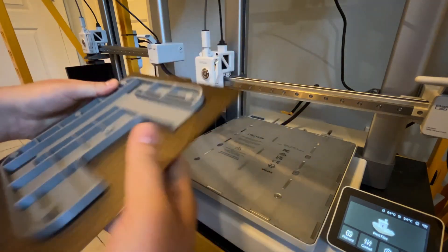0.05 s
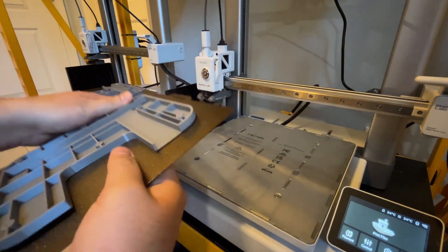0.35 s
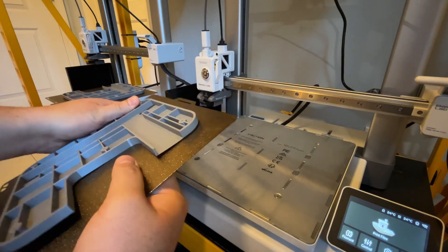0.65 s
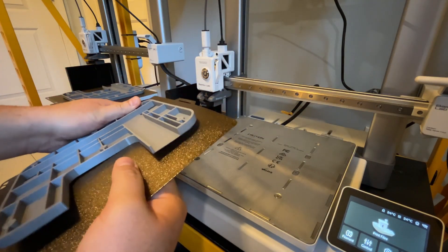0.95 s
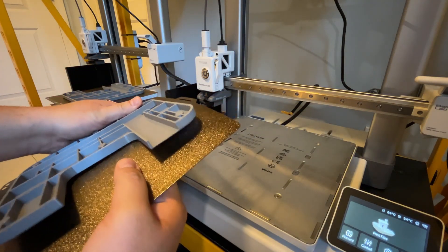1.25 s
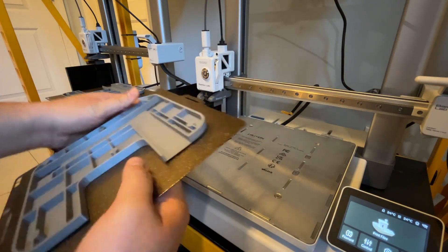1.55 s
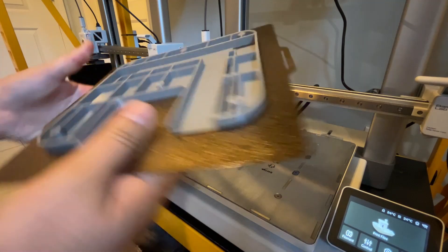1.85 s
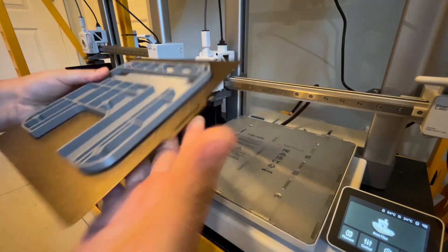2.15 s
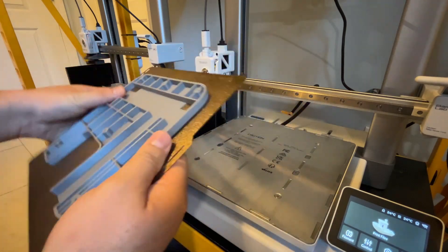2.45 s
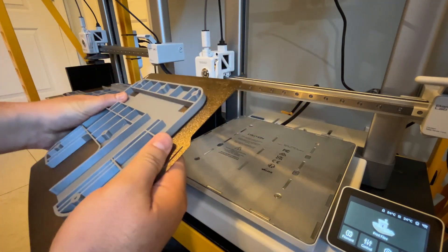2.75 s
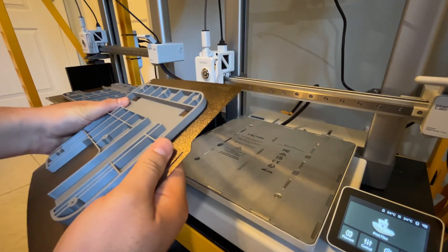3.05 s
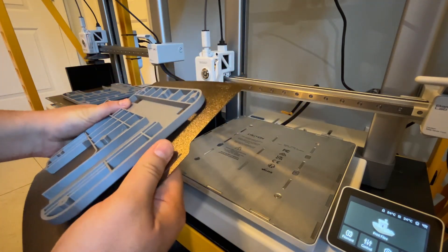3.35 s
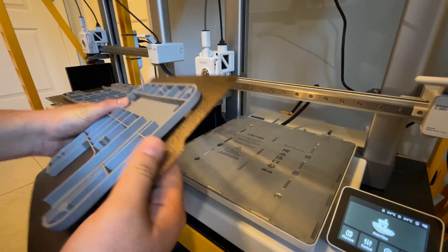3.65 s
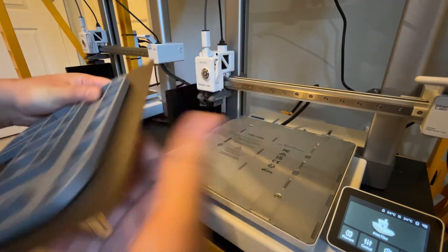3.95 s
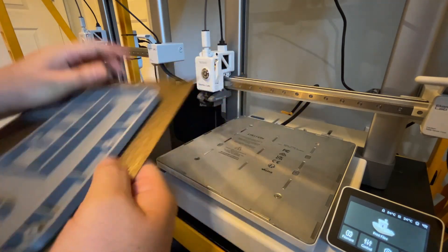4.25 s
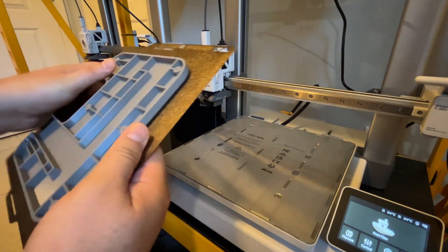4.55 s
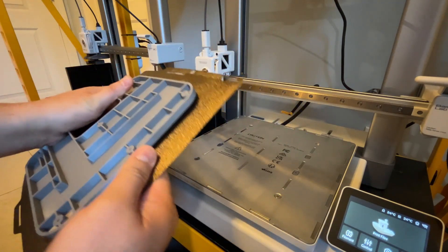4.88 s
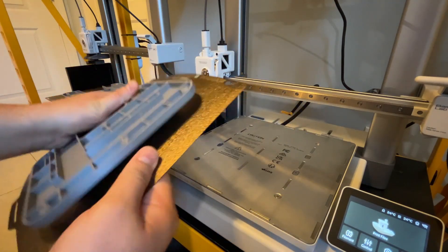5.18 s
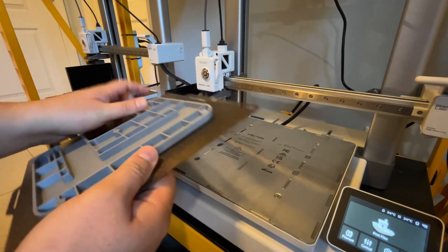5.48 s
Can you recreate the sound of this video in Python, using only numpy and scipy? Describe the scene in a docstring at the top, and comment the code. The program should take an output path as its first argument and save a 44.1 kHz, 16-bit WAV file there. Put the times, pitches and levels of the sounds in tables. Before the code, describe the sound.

Close ticks thicken into crackles and sharp rips as plastic pops off a bent metal sheet, with soft finger knocks between three pulls.

```python
"""A small room, with the microphone close to a spring-steel build plate that is flexed by hand three times.
Printed parts peel off its textured coating as tiny bonds break: sparse ticks thicken to crackle, then
to a rip. The second and third pulls end in a twang and the ring of the freed part. Between pulls the
hands knock and slide on the plate, over handling rumble, room air and a faint machine hum.
The loudest rips overload the microphone."""
import sys
import numpy as np
from scipy import signal
from scipy.fft import rfft, irfft
from scipy.io import wavfile
from scipy.ndimage import uniform_filter1d

SR = 44100
rng = np.random.default_rng(int(sys.argv[2]) if len(sys.argv) > 2 else 0)


def master_out(mix):
    """Clip the mix to full scale and print it as 16-bit PCM to the path in sys.argv[1]."""
    frames = np.transpose(np.atleast_2d(mix))
    ceiling = np.clip(frames, -1, 1)
    pcm = np.round(ceiling * 32767).astype(np.int16)
    wavfile.write(sys.argv[1], SR, pcm)


N = 243431

# fingertips and nails landing on the plate: t/s, tap level/dB, thud level/dB (both relative)
KNOCKS = [(0.018, -35, -46), (1.962, -34.5, -48.5), (2.011, -36, -53.5), (2.05, -40, -54.5),
          (2.347, -40, -45), (2.369, -44, -54.5), (2.518, -42, -53), (3.775, -36.5, -54), (3.836, -49, -58),
          (4.146, -51.5, -65.5), (4.218, -50, -65.5), (4.291, -45, -70.5), (5.439, -41.5, -55)]
# a short low bump opens the sound, then a palm meets the plate softly in each later row: t/s, relative level/dB
LOW_BUMPS = [(.003, -42), (.165, -47), (1.82, -51), (4.1, -55.5), (4.46, -55.5), (4.51, -57.5)]
# spectrum of the plate under a finger: f/Hz, level/dB
TOUCH_COLOUR = [(180, -32), (300, 0), (1150, -1), (1700, -1), (3440, -10), (5350, -8.5), (7300, -8.5),
                (8740, -15.5), (11700, -13), (15000, -32)]


def amp(db):
    """Decibels to gain."""
    return 10 ** (np.asarray(db) / 20)


def unit(x):
    """Scaled to rms 1."""
    return x / np.sqrt(np.mean(x ** 2) + 1e-20)


def along(points, hz):
    """Read (f/Hz, value) points on a log frequency axis."""
    f, values = np.transpose(points)
    return np.interp(np.log(hz + 1), np.log(f + 1), values)


def add(track, s, sound):
    """Mix a sound into the track at time s."""
    part = track[max(0, round(s * SR)):][:len(sound)]
    part += sound[:len(part)]


def coloured(x, spectrum, size=8192):
    """x through a minimum-phase filter of unit energy, shaped by (f/Hz, level/dB) points."""
    cepstrum = irfft(np.log(amp(along(spectrum, np.fft.rfftfreq(size, 1 / SR))) + 1e-6))
    cepstrum[1:size // 2] *= 2
    cepstrum[size // 2 + 1:] = 0
    response = irfft(np.exp(rfft(cepstrum)))
    return signal.fftconvolve(x, response / np.linalg.norm(response))[:len(x)]


def noise(spectrum):
    """Coloured noise of rms 1."""
    return unit(coloured(rng.standard_normal(N), spectrum))


def swells(rows):
    """Gain of smooth swells: t/s, level/dB, half length/s."""
    t = np.arange(N) / SR
    return sum(amp(db) * np.exp(-((t - s) / half) ** 2) for s, db, half in rows)


def background(hold_db=-52.5, hum_hz=73, air_db=-60.5):
    """Rumble that swells at the very start and as the hands move; faint machine hum; room air."""
    # the arms shift their grip or recoil: t/s, level/dB, half length/s
    shifts = [(.46, -38, 0.14), (.85, -36, 0.19305), (2.37, -40, 0.03196), (3.42, -40.5, 0.069),
              (4.3, -46, 0.037), (5.15, -41, 0.11)]
    # spectra of the rumble and the air: f/Hz, level/dB
    rumble_colour = [(8.8, -30), (15, 12), (47, -1.5), (95, -14), (156, -30.5), (200, -26), (260, -44),
                     (440, -120)]
    air_colour = [(60, 0), (150, -7), (350, -14), (700, -26), (1500, -29), (3000, -36), (6000, -38),
                  (15500, -50)]
    # the hum's drifting level: t/s, level/dB
    hum_levels = [(0, -68), (1.2, -61.5), (2.5, -71), (4.0, -63.5), (4.7, -57), (5.52, -55.5)]
    t = np.arange(N) / SR
    bump_swells = [(s, db + 8, 0.045) for s, db in LOW_BUMPS]
    rumble = np.hypot(amp(hold_db), swells(shifts + bump_swells)) * noise(rumble_colour)
    hum_rms = amp(np.interp(t, *np.transpose(hum_levels)))
    hum = hum_rms * np.sqrt(2) * np.sin(2 * np.pi * hum_hz * t)
    return rumble + hum + amp(air_db) * noise(air_colour)


def room(x, build_up_s=0.0017, count=28):
    """The small room's diffuse tail; its fine pattern changes as the plate moves."""
    # reverberation time: f/Hz, t60/s
    decay_times = [(150, .4), (700, 0.45), (1800, 0.43), (5000, 0.37), (9000, 0.32), (15000, 0.28)]
    out = np.zeros(N)
    for piece in np.array_split(np.arange(N), count):
        hz, t, bands = signal.stft(rng.standard_normal(SR // 2), SR, nperseg=256)
        decay = amp(-60 * t / along(decay_times, hz)[:, None])
        tail = signal.istft(bands * decay, SR, nperseg=256)[1]
        tail *= 1 - np.exp(-np.arange(len(tail)) / SR / build_up_s)
        add(out, piece[0] / SR, signal.fftconvolve(x[piece], tail / np.linalg.norm(tail)))
    return out


def crack(front_t60, ring_t60, ring_db, size=2048):
    """A fracture or impact of unit energy: a sharp front, then bending waves scattering in the sheet."""
    t = np.arange(size) / SR
    envelope = amp(-60 * t / front_t60) + amp(ring_db - 60 * t / ring_t60)
    burst = rng.standard_normal(size) * envelope
    return burst / np.linalg.norm(burst)


def at_a_spot(burst, spread_db):
    """Each spot of the sheet favours other frequencies; unit energy."""
    # where a spot boosts or cuts: f/Hz
    spot_hz = [600, 1200, 2000, 3200, 4800, 6500, 8500, 11000, 14500]
    spot_db = spread_db * rng.standard_normal(len(spot_hz))
    burst = coloured(burst, np.transpose([spot_hz, spot_db]), size=2048)
    return burst / np.linalg.norm(burst)


def fronts(rows, stop_s=.016):
    """Gain and event rate of fronts that swell, run and stop; 20 dB takes rise_s up and stop_s down."""
    t = np.arange(N) / SR
    power, weighted_rate = np.zeros(N), np.zeros(N)
    for start, end, start_db, end_db, rise_s, per_s in rows:
        run_db = np.interp(t, [start, end], [start_db, end_db])
        fade_db = 20 * (np.maximum(start - t, 0) / rise_s + np.maximum(t - end, 0) / stop_s)
        share = amp(run_db - np.minimum(fade_db, 200)) ** 2
        power += share
        weighted_rate += share * per_s
    return np.sqrt(power), weighted_rate / power


def scatter(count):
    """Normal draws, limited to two standard deviations."""
    return np.clip(rng.standard_normal(count), -2, 2)


def jerks(per_s=110, depth_db=2.5):
    """A front advances in jerks: a random gain of rms 1 that bunches the crackle into clumps."""
    knots = scatter(N // 50)
    wander = np.interp(np.arange(N) * per_s / SR, np.arange(len(knots)), knots)
    return unit(amp(depth_db * wander))


def crackle(gain, rate, scatter_db, count=40):
    """Tiny bonds break at random along a moving front, each at one of several spots of the sheet."""
    moving = gain > amp(-95)
    breaking = rng.random(N) < moving * rate / SR
    breaks = breaking * rng.choice([-1, 1], N) * amp(scatter_db * scatter(N))
    # energy is supplied steadily, and nearby breaks share it
    local_power = np.abs(uniform_filter1d(breaks ** 2, size=700))
    breaks *= gain * jerks() / np.sqrt(local_power + 0.00033)
    spots = np.array([at_a_spot(crack(front_t60=.005, ring_t60=.015, ring_db=-8), spread_db=3)
                      for _ in range(count)])
    when = np.flatnonzero(breaks)
    bursts = breaks[when, None] * spots[rng.integers(count, size=len(when))]
    positions = when[:, None] + np.arange(spots.shape[1])
    return np.bincount(positions.ravel(), bursts.ravel(), N)[:N]


def finger_taps():
    """Fingers tap the plate; a fleshy touch, with more thud, gives a duller tap than a nail."""
    taps = np.zeros(N)
    for s, db, thud_db in KNOCKS:
        cutoff_hz = np.clip(1200 * amp(db - thud_db), 500, 15000)
        impact = crack(front_t60=0.033, ring_t60=0.082, ring_db=-1, size=4096)
        tap = signal.lfilter(*signal.butter(2, cutoff_hz, fs=SR), impact)
        add(taps, s, amp(db + 19.5) * tap)
    return coloured(taps, TOUCH_COLOUR)


def low_thuds():
    """A short low bump opens the sound; then fingers and palms land on the plate with soft thuds."""
    # spectrum of a thud: f/Hz, level/dB
    thud_colour = [(40, -38.5), (110, -1), (160, -2), (250, -7.5), (400, -11.5), (900, -31), (2500, -72)]
    thuds = np.zeros(N)
    for s, *_, db in [*KNOCKS, *LOW_BUMPS]:
        add(thuds, s, amp(db + 27.5) * crack(front_t60=0.022, ring_t60=.08, ring_db=-6, size=4096))
    return coloured(thuds, thud_colour)


def hand_friction():
    """Skin rubs on the steel, settles with a thin hiss and scrapes over the grainy coating."""
    # grip changes and the settling hand: t/s, level/dB, half length/s
    rubs = [(-0.01, -48, 0.02759), (1.731, -60, 0.12408), (2.03, -63.5, 0.19), (2.355, -65.5, 0.14),
            (4.16, -68.5, 0.054), (4.22, -60.5, 0.016), (4.487, -63.5, 0.037), (5.46, -55.5, 0.045)]
    settling = [(.28, -61, 0.12)]
    # skin catching on the grain: start/s, end/s, start level/dB, end level/dB, rise/s, catches/(1/s)
    scrapes = [(4.318, 4.342, -43.5, -43, 0.03, 900)]
    # spectra of the hiss and the scrape: f/Hz, level/dB
    settle_colour = [(1000, -12), (2500, -4.5), (4500, -13), (8000, -8), (12000, 0), (15500, -9)]
    scrape_colour = [(200, -18), (800, -12), (1400, -5), (2600, -4), (4000, -3), (5500, -4), (9000, -14),
                     (15000, -23)]
    rub = swells(rubs) * noise(TOUCH_COLOUR)
    hiss = swells(settling) * noise(settle_colour)
    catches = crackle(*fronts(scrapes), scatter_db=0, count=24)
    return rub + hiss + coloured(catches, scrape_colour)


def spring_back():
    """The sheet springs back: fast high bending waves arrive first as a falling twang, then modes ring."""
    # a part springs free: t/s, ring level/dB, ring centre/Hz,
    # then the twang's level/dB, start/Hz, end/Hz, length/s
    releases = [(3.326, -24.5, 1800, -10.5, 6960, 4714, .012), (3.376, -16.5, 1402, -9, 7700, 3610, .007),
                (5.13, -38, 1770, -20, 6872, 4690, .008), (5.149, -4.5, 1880, -2.5, 7700, 3882, .015)]
    # modes of the freed part and the sheet, damped by the hands: f/Hz, level/dB, t60/s
    modes = [(1214, -9.5, 0.15), (1381.4, -2.5, 0.11), (1530, -9, .08), (1620, -16.5, 0.27),
             (1785, -4, 0.099), (2120, 7, 0.023), (2378, 6, 0.031), (2974, -3.5, 0.13)]
    out, t = np.zeros(N), np.arange(SR // 2) / SR
    attack = 1 - np.exp(-t / 0.0013)
    for s, ring_db, centre_hz, twang_db, start_hz, end_hz, length in releases:
        for hz, db, t60 in modes:
            # where the part lets go decides which modes are struck hardest
            strike_db = ring_db + db - 16 * abs(np.log2(hz / centre_hz))
            tone = np.sin(2 * np.pi * (hz * t + rng.random()))
            add(out, s, amp(strike_db - 60 * t / t60) * attack * tone)
        progress = np.clip(t / length, 0, 1)
        pitch = start_hz * (end_hz / start_hz) ** progress
        twang = np.sin(np.pi * progress) * np.sin(2 * np.pi * np.cumsum(pitch) / SR)
        add(out, s - length / 2, amp(twang_db) * twang)
    return out


def ticks(creep, per_s=55, boost_db=18, scatter_db=2.5):
    """(t/s, level/dB) of small patches letting go at random in a pull, harder as the sheet bends."""
    when = np.flatnonzero((rng.random(N) < per_s / SR) & (creep > amp(-70)))
    offset_db = boost_db + scatter_db * scatter(N)
    return [(i / SR, 20 * np.log10(creep[i]) + offset_db[i]) for i in when]


def slips(count=6):
    """(t/s, level/dB) of the slips before a rip: the front gives way ever faster and harder."""
    # runs of slips: start/s, first gap/s, ratio of successive gaps, first level/dB, last level/dB
    run_ups = [(3.2725, .0076, .92, -12.5, -1), (5.0445, .0302, .58, -13, 2.5)]
    climb = np.linspace(0, 1, count) ** 0.63  # the level climbs early
    rows = []
    for s, gap, shrink, first_db, last_db in run_ups:
        gaps = gap * shrink ** np.arange(count)
        levels = first_db + (last_db - first_db) * climb
        rows += zip(s + np.cumsum(gaps) - gaps, levels)
    return rows


def snap(tear_s=0.0022, shiver_t60=.022, size=2048):
    """A patch tears through in about two milliseconds, then the sheet shivers; unit energy."""
    t = np.arange(size) / SR
    tear = np.exp(-(t / tear_s) ** 2)
    shiver = amp(-10 - 60 * t / shiver_t60)
    attack = 1 - np.exp(-t / 0.00056)
    return at_a_spot(rng.standard_normal(size) * (tear + shiver) * attack, spread_db=1)


def peeling(creep_rise_s=.07, creep_per_s=450):
    """Parts creep, tear and snap off the coating; the colour changes with the grip and the loose area."""
    # the sheet bends and the front creeps ever louder: start/s, end/s, start level/dB, end level/dB
    pulls = [(0.383, 1.14, -58, -39), (2.5, 3.28, -60.5, -39), (4.64, 5.1, -61, -38)]
    # the front breaks loose: start/s, end/s, start level/dB, end level/dB, rise/s, fractures/(1/s)
    tears = [(.621, .674, -22.5, -26, 0.0346, 1300), (.85, .925, -31.5, -18, 0.1464, 740),
             (.934, .982, -11.5, -15.5, 0.0539, 1900), (1.158, 1.178, -22.5, -23.5, 0.0426, 2310),
             (1.245, 1.345, -25, -27, 0.2169, 2000), (1.39, 1.496, -31.5, -29.5, 0.17, 1560),
             (2.79, 2.83, -39, -42.5, 0.11, 403), (2.93, 2.99, -37, -37, 0.0753, 410),
             (3.032, 3.055, -29, -32, 0.0231, 348), (3.2, 3.26, -39, -35, 0.004, 400),
             (3.315, 3.335, -12, -9, 0.0269, 1500), (3.49, 3.634, -38, -32.5, 0.01, 354),
             (4.716, 4.74, -38, -43, 0.0752, 895), (4.84, 4.895, -31, -34, 0.0681, 1550),
             (5.12, 5.157, -3.5, -5, 0.012, 4490)]
    # large patches letting go at once: t/s, relative level/dB
    snaps = [(.4311, -31.5), (.517, -26.5), (.6165, -13), (.6288, -13), (.7125, -21), (.7345, -20),
             (.7635, -15.5), (.8218, -14.5), (.8305, -14.5), (.8505, -7), (.916, -4.5), (.9303, -2.5),
             (.9489, -3), (.9779, 2), (1.1535, -6), (1.166, -7.5), (1.2478, -10), (1.3, -9), (1.34, -10),
             (1.4941, -16.5), (2.701, -19.5), (2.772, -22), (2.8081, -19), (2.8342, -12.5), (2.9062, -14),
             (2.912, -13), (3.001, -13), (3.0245, -11), (3.07, -11.5), (3.0913, -13), (3.108, -11),
             (3.116, -11), (3.131, -13), (3.2215, -9.5), (3.3751, 7.5), (3.4701, -7), (3.5445, -15),
             (3.558, -13.5), (3.6062, -12.5), (3.628, -12.5), (4.8145, -22.5), (4.8317, -7.5)]
    # bounds of the stages between changes of grip or loose area: t/s
    stages = [0, .89, 1.1, 2, 3.3, 3.45, 4, 5.115, 6]
    # what plate and part radiate in each stage: f/Hz, level/dB
    first_pull = [(88, -60.5), (150, -26.5), (420, -17), (462, -7), (509, -17.5), (643, -14), (877, -25),
                  (1040, -11), (1240, -17.5), (1510, -6), (3550, -17), (5130, -2.5), (9360, -5),
                  (11400, -0.5), (15500, -9.5)]
    first_rip = [(88, -49.5), (150, -23.5), (350, -20.5), (480, -9.5), (700, -8), (930, -18.5),
                 (1550, -7.5), (2400, -9), (3400, -12.5), (4900, -0.5), (7400, 2.5), (9400, -7), (12000, 0),
                 (15500, -11.5)]
    lifted = [(88, -66), (150, -23.5), (339, -15), (373, -19.5), (462, -15.5), (877, -20), (1270, -9),
              (1480, -7), (1870, -5.5), (3350, -11), (5870, 1.5), (7410, 1), (9730, -7.5), (13300, -2.5),
              (15500, -11.5)]
    second_pull = [(88, -52), (150, -25), (519, -18.5), (660, -5.5), (877, -20), (1300, -14), (1680, -8.5),
                   (2100, -20.5), (2380, -8), (2620, -7.5), (2900, -18), (3410, -19), (3980, -7), (5440, 0),
                   (9180, -6.5), (13000, -10), (15500, -9)]
    second_rip = [(88, -45), (150, -14.5), (359, -12), (540, -12), (631, -12), (751, -20.5), (1200, -11),
                  (1370, -3), (1800, -7), (2020, -14.5), (2360, -3.5), (3410, -19.5), (3980, -4.5),
                  (6600, 1.5), (15500, -10.5)]
    third_pull = [(88, -53.5), (150, -19.5), (280, -9.5), (420, -9), (600, -2), (850, -14), (1150, -11),
                  (1550, 0.5), (2200, -13), (3500, -14.5), (5100, -4), (6400, 0.5), (9700, -8.5),
                  (13000, -4.5), (15500, -10)]
    third_rip = [(88, -38), (150, -23.5), (332, -17.5), (520, -12.5), (800, -17.5), (1090, -13), (1170, -8),
                 (1510, -8.5), (1760, -4), (1980, -12.5), (2410, -9.5), (2810, -12.5), (3980, -8.5),
                 (4480, -14), (5990, -3.5), (9700, -9), (13000, -10.5), (15500, -14)]
    colours = [first_pull, first_rip, lifted, second_pull, second_rip, second_pull, third_pull, third_rip]
    creep, creep_rate = fronts([(*pull, creep_rise_s, creep_per_s) for pull in pulls])
    force = crackle(creep, creep_rate, scatter_db=3)
    force += crackle(*fronts(tears), scatter_db=2)
    for s, db in [*snaps, *slips(), *ticks(creep)]:
        add(force, s, amp(db + 10) * snap())
    t = np.arange(N) / SR
    return sum(coloured(force * (t >= start) * (t < end), colour)
               for start, end, colour in zip(stages, stages[1:], colours))


def scene():
    """Plate and hands close to one microphone, with the room behind them."""
    plate = amp(0.5) * (peeling() + spring_back())
    direct = plate + finger_taps() + low_thuds() + hand_friction()
    return (direct + room(amp(-6.5) * direct) + background())[None]


def record(dry, ceiling=.95, top_hz=16000):
    """The close microphone overloads softly on the loudest rips; the top of the band is cut off."""
    squashed = dry / (1 + np.abs(dry / ceiling) ** 4) ** (1 / 4)
    lowpass = signal.firwin(301, top_hz, fs=SR)
    return signal.fftconvolve(squashed, lowpass[None], mode="same")


dry = scene()
out = record(dry)
master_out(out)
```